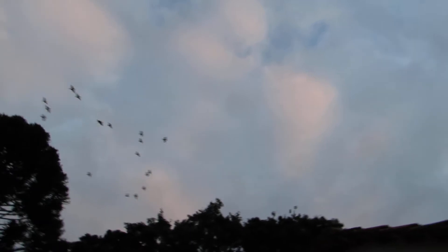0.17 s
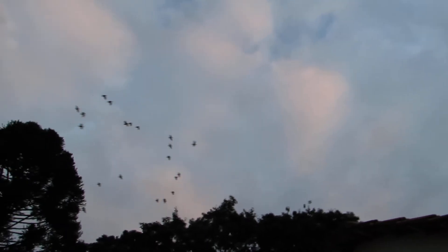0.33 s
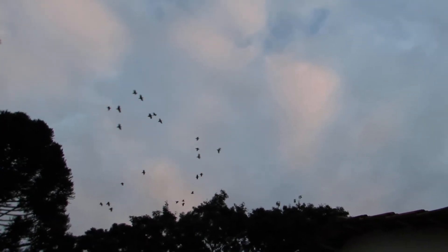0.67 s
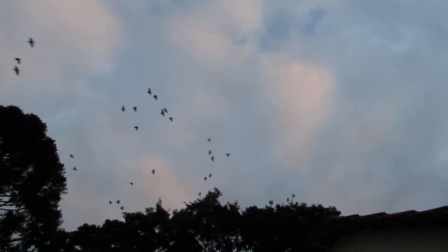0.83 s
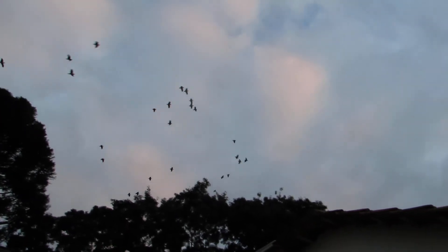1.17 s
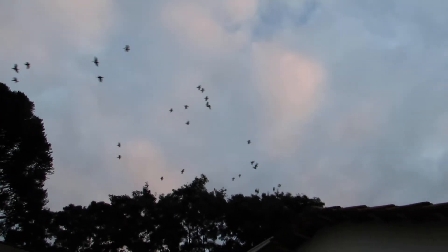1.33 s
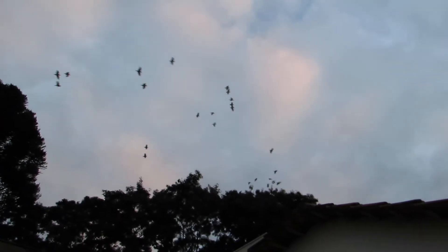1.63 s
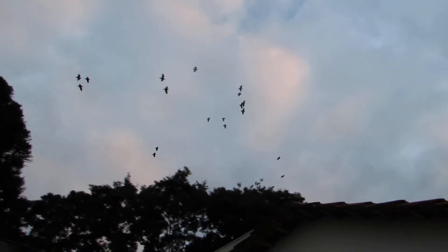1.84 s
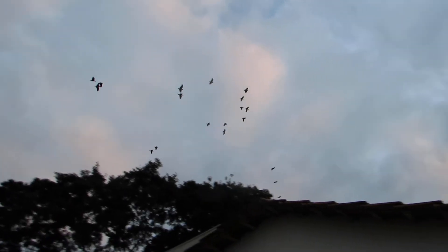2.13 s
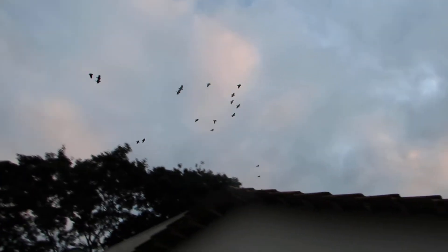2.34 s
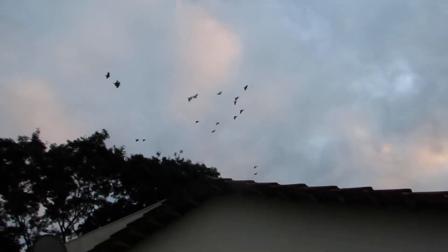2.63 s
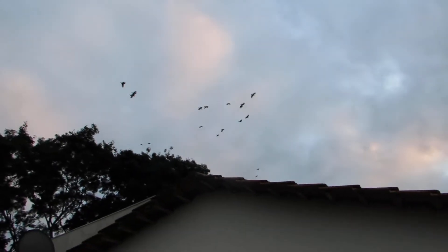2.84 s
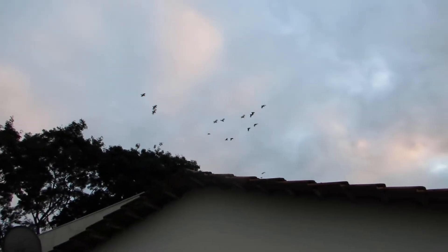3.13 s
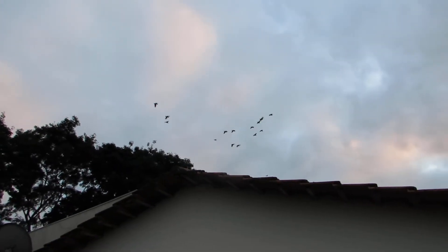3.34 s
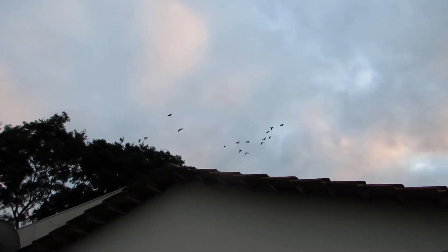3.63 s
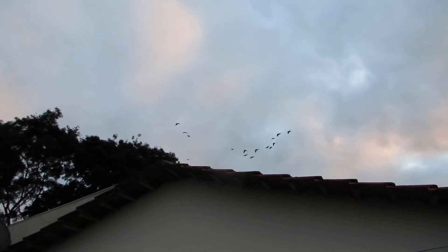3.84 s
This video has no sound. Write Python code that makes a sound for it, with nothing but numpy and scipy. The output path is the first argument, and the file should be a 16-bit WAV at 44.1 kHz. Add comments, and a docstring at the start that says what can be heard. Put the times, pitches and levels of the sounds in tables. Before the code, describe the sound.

Parrots call all at once in the open air, raspy squawks and quick yelps standing out from distant chatter throughout. Low wind rumbles on the microphone, with dull handling bumps and one small click in the first half.

```python
"""A flock of parrots flies over a house at dusk, all calling at once.
Outdoor hiss and wind rumble swell in under the far flock's chatter. Near birds break in with gliding
squawks and harsh rasps, buzzing voices shaped by the throat and echoed by walls and trees. Soft handling
knocks begin, the camera clicks once at 0.74 s, and air puffs on the microphone at 1.2 s.
Short yelps cluster from about 1 to 3 s; squawks and chatter carry on to the end."""
import sys
import numpy as np
from scipy import signal
from scipy.fft import rfft, irfft, next_fast_len
from scipy.io import wavfile
from scipy.ndimage import uniform_filter1d

SR = 44100
rng = np.random.default_rng(int(sys.argv[2]) if len(sys.argv) > 2 else 0)


def store_pcm(level_fs):
    """Save levels as 16-bit WAV."""
    pcm = np.round(np.clip(level_fs, -1, 1) * 32767).astype(np.int16)
    wavfile.write(sys.argv[1], SR, np.atleast_2d(pcm).T)


N = 175959

# near squawks: start_s, length_s, first_hz, middle_hz, last_hz, level_db, roughness (0-1),
# throat_hz, treble_db
SQUAWKS = [ (0.222, 0.21, 772.4, 737, 668, -37, 0.41, 2470, 12),
           (0.332, 0.086, 1319, 1217, 1120, -32, 0.1, 2470, 7),
           (0.369, 0.12, 1231, 1153, 1120, -37.5, 0.78, 1320, 9),
           (0.486, 0.03, 1200, 1322, 1380, -41, 0.2, 2630, -15),
           (0.52, 0.06, 1393, 1235, 1160, -31, 0.32, 2500, -1),
           (0.569, 0.077, 1212, 1106, 1040, -33.5, 0.48, 2270, 4),
           (0.557, 0.16, 683, 663.3, 641.5, -37, 0.32, 1410, 15),
           (.69, 0.098, 1130, 1124, 1065, -34, 0.31, 2200, 6.5),
           (0.841, 0.022, 1286, 1122, 960, -40, 0, 2170, -3),
           (0.931, 0.29, 722, 736, 750, -43, 0.82, 1560, 10),
           (1.156, 0.036, 738, 781, 765, -40.5, 0.25, 1570, 2),
           (1.164, 0.048, 1430, 1380, 724, -38.5, .08, 2500, 7),
           (1.196, 0.043, 1085, 945, 764, -36.5, 0.17, 1800, -5),
           (1.247, 0.094, 1135, 1340, 1120, -36.5, .05, 2400, -2),
           (1.289, .12, 624.4, 759, 745, -37, 0.2, 1470, 11.5),
           (1.348, 0.081, 1176, 1230, 1083, -32.5, 0.1, 2360, -2),
           (1.36, 0.086, 1018, 1042, 1046, -37.5, 0.13, 2090, 6),
           (1.339, 0.2, 650, 603, 580, -35, 0.45, 1240, 4),
           (1.432, 0.056, 1278, 1211, 1080, -37.5, 0.04, 2340, 13),
           (1.435, 0.048, 1009, 866, 790, -35, 0.23, 1710, -4),
           (1.519, 0.049, 678, 829, 833, -39.5, 0.4, 1730, -18),
           (1.611, 0.055, 941, 1001, 1044, -37, 0.5, 2050, 6),
           (1.661, 0.047, 673, 1040, 936, -34.5, 0.35, 2060, 3),
           (1.685, 0.079, 1121, 948, 800, -34, 0.61, 2050, 4),
           (1.885, .17, 570.2, 566.4, 512, -35, 0.63, 1490, 7.5),
           (1.892, 0.062, 1112, 1108, 998, -33.5, .3, 2100, 13),
           (1.965, 0.066, 768, 731.5, 687, -38.5, 0.41, 2020, 27),
           (2.004, 0.23, 923, 929.6, 890, -43, 0.35, 885, 0),
           (2.251, 0.16, 585, 558.4, 604, -37.5, 0.45, 1860, 3),
           (2.371, 0.14, 1001, 1082, 1105, -35.5, 0.6, 2210, 4),
           (2.494, 0.17, 679, 660, 638, -35.5, 0.88, 2180, 5),
           (2.772, .075, 583.5, 629, 602, -34, 0.62, 1320, 5),
           (2.551, 0.26, 785, 805, 791, -38, 0.4, 1590, 1),
           (2.834, 0.043, 1065, 1053, 1008, -34.5, 0.3, 2060, 6),
           (2.863, .1, 1108, 1069, 994, -38.5, 0.41, 2140, 15),
           (3.057, 0.13, 698.5, 704, 678, -37, 0.09, 3000, 16),
           (3.114, 0.06, 1030, 962, 864, -40, 0.3, 1800, -3),
           (3.16, 0.061, 1409, 1285, 1244, -29.5, 0.23, 2630, 5),
           (3.225, 0.28, 607, 570.3, 587.5, -42, 0.26, 1380, 9),
           (3.399, 0.071, 1130, 1086, 936, -36, 0.13, 2050, 9.5),
           (3.434, 0.041, 1071, 1023, 970, -33.5, 0, 2000, -4),
           (3.568, 0.076, 1063, 1025, 995, -40, 0.5, 2130, 5),
           (3.63, 0.14, 735, 722.4, 728, -42.5, 0.38, 1480, 5),
           (3.79, 0.099, 1089, 1202, 1225, -36.5, 0.34, 1100, 13),
           (3.825, 0.028, 1120, 998, 890, -34.5, 0.27, 1960, 7),
           (3.83, 0.1, 1215, 1266, 1223, -32, 0.64, 2650, 13)]
# short arched notes: start_s, top_pitch_hz, level_db
YELPS = [(.957, 1120, -37.5), (.972, 1380, -39.5), (.984, 1118, -36.5), (1.025, 1450, -41),
         (1.07, 1125, -38.5), (1.125, 1130, -34.5), (1.859, 1054, -36.5), (1.899, 1124, -30),
         (1.949, 1127, -28), (2.0, 1050, -35), (2.25, 1075, -41), (2.269, 1310, -37), (2.3, 1094, -39),
         (2.35, 1260, -40), (2.392, 1036, -33.5), (2.415, 1186, -34), (2.545, 992, -36), (2.59, 795, -37.5),
         (2.634, 822, -31.5), (2.696, 808, -33.5), (2.752, 816, -35), (3.008, 1137, -37.5)]
# tone colour of a parrot's voice: frequency_hz, gain_db
VOICE_EQ = [(100, -39), (300, -9), (650, -8.5), (950, -1), (1400, 4), (2400, 0), (3100, -4), (4300, -5.5),
            (5800, -13), (7300, -19.5), (9000, -25), (10000, -30), (12000, -25.5), (15000, -62)]
# swells of the far flock: time_s, level_db
FLOCK_SWELLS = [(0, -47), (.2, -44.5), (.45, -39), (1.0, -36.5), (1.25, -38), (1.45, -38.5), (1.6, -43.5),
                (1.82, -41), (2.0, -37), (2.18, -42.5), (2.6, -33.5), (2.85, -40.5), (3.0, -40.5),
                (3.3, -36), (3.532, -50), (3.7, -38.5), (4.0, -41)]
# time for the echoes to die away: frequency_hz, t60_s
ECHO_DECAY = [(300, 0.64), (2000, 0.25), (6000, 0.36), (14000, 0.13)]
# soft knocks on the camera: start_s, level_db, pitch_hz
KNOCKS = [(.447, -24, 410), (0.461, -21.5, 384), (0.477, -21.5, 390), (0.531, -24, 485),
          (0.562, -22.5, 420), (0.742, -22.5, 400), (0.96, -22.5, 490), (1.088, -25, 261),
          (1.244, -17.5, 315), (1.497, -22.5, 443), (2.695, -24, 494)]
# ring of the camera's click: frequency_hz, level_db, t60_s
CLICK_MODES = [(570, -6, 0.014), (1250, 3.5, 0.0055), (2760, 0.5, 0.0065), (6900, -1.5, 0.0072),
               (7560, -1.5, .007), (8560, -5.5, 0.014), (12700, -17, 0.0064)]
# outdoor air common to both channels: frequency_hz, density_db
AIR_MID = [(25, 1), (125, -0.5), (300, -4), (650, -10.5), (900, -2), (1350, -16), (2100, -10.5),
           (2800, -16), (4400, -23), (8100, -37), (11500, -35), (15000, -49)]
# outdoor air opposed between the channels: frequency_hz, density_db
AIR_SIDE = [(25, -11), (125, 7), (200, -15), (300, -16), (500, -3), (650, -8), (2100, -23), (3600, -30),
            (7500, -34), (12000, -44), (15000, -57)]
# wind on the microphone: frequency_hz, density_db
WIND_RUMBLE = [(15, -10), (30, 0), (70, 18.5), (130, 2), (200, 8), (350, -1), (600, -10), (1200, -48)]

LEFT_LEAN_DB = 2.0  # birds and echoes sit to the left
TOP_HZ = 14700  # upper edge of the whole sound


def parrot_call(length_s, first_hz, middle_hz, last_hz, level_db, rough, throat_hz, treble_db):
    """One call: a buzz coloured by the throat, joined by its bounce off the roof, placed in stereo."""
    attack, release = 0.31, 0.19  # shares of the length
    roof_gain, roof_max_s, lag_max_s = 0.46, .005, .00003
    n = int(length_s * SR)
    progress = np.linspace(0, 1, n)
    pan, lag, path = rng.uniform(-1, 1, 3)
    buzz = voice_buzz(progress, first_hz, middle_hz, last_hz, rough)
    size = next_fast_len(2 * n)
    f = np.fft.rfftfreq(size, 1 / SR)
    roof = 1 + roof_gain * np.exp(-2j * np.pi * f * roof_max_s * abs(path))
    voice = unit(irfft(rfft(buzz, size) * throat(f, throat_hz, treble_db) * roof, size)[:n])
    ramp = np.clip(np.minimum(progress / attack, (1 - progress) / release), 0, 1)
    voice *= amp(level_db) * np.sin(np.pi / 2 * ramp)
    right = irfft(rfft(voice, size) * np.exp(2j * np.pi * f * lag * lag_max_s), size)[:n]
    lean_db = LEFT_LEAN_DB - pan
    return np.array([voice * amp(lean_db), right * amp(-lean_db)])


def voice_buzz(progress, first_hz, middle_hz, last_hz, rough):
    """A gliding harmonic tone; roughness shakes its pitch, adds breath and chops it into a rasp."""
    n = len(progress)
    glide_hz = np.polyval(np.polyfit([0, .5, 1], [first_hz, middle_hz, last_hz], 2), progress)
    jitter = 0.0632 * rough * wobble(n, rate_hz=356)
    waver = 0.0079 * np.sqrt(rough) * wobble(n, rate_hz=91)
    bend = 0.01127 * np.sqrt(rough) * wobble(n, rate_hz=21)
    phase = 2 * np.pi * np.cumsum(glide_hz * (1 + jitter + waver) * (1 + bend)) / SR
    tone = harmonics(phase, middle_hz)
    breath = (1 + np.cos(phase)) * wobble(n, rate_hz=TOP_HZ)  # one puff per cycle
    rasp = np.exp(0.63 * np.sqrt(rough) * np.tanh(wobble(n, rate_hz=169)))
    return ((1 - rough ** 2) * tone + 0.78 * rough * breath) * rasp


def harmonics(phase, pitch_hz):
    """A stack of partials that each flutter in level; the lowest two hold steady."""
    flutter_s, flutter_db = .014, 3
    steps = np.arange(len(phase)) / SR / flutter_s
    gains = amp(flutter_db * rng.standard_normal((32, 32)))
    gains[:2] = 1
    return unit(sum(np.interp(steps, np.arange(len(gain)), gain) * np.cos(k * phase)
                    for k, gain in enumerate(gains[:int(TOP_HZ / pitch_hz)], 1)))


def throat(f, throat_hz, treble_db):
    """Gain curve of the voice: its tone colour, a treble shelf and two throat resonances."""
    lower_width_hz, upper_width_hz = 375, 440
    shelf_db = treble_db * curve([(2500, 0.17), (4200, 0.9)], f)
    lower_db = 15 / (1 + ((f - throat_hz) / lower_width_hz) ** 2)
    upper_db = 6 / (1 + ((f - 2.6 * throat_hz) / upper_width_hz) ** 2)
    return amp(curve(VOICE_EQ, f) + shelf_db + lower_db + upper_db)


def near_birds():
    """The birds overhead: squawks, and quick yelps that rise and fall in pitch."""
    out, yelp_s = np.zeros((2, N)), .027
    for start_s, *shape in SQUAWKS:
        add(out, start_s, parrot_call(*shape))
    for start_s, top_hz, level_db in YELPS:
        foot_hz = .85 * top_hz
        add(out, start_s, parrot_call(yelp_s, foot_hz, top_hz, foot_hz, level_db,
                                      rough=.15, throat_hz=2 * top_hz, treble_db=-4))
    return out


def far_flock():
    """The rest of the flock: a bed of short random calls whose level swells and sinks."""
    calls_per_s, shortest_s, longest_s = 55, 0.0299, .13
    out, count = np.zeros((2, N)), int(calls_per_s * N / SR)
    for slot in range(count):
        when, length, pitch, glide, loudness, resonance = rng.random(6)
        length_s = shortest_s + (longest_s - shortest_s) * length
        middle_hz = 600 + 620 * pitch
        first_hz = middle_hz * (1 + .3 * (glide - .7))
        call = parrot_call(length_s, first_hz, middle_hz, .86 * middle_hz, 6 * loudness,
                           rough=0.426, throat_hz=900 + 1500 * resonance, treble_db=4)
        add(out, (slot + when) / count * N / SR, call)
    return unit(out) * amp(np.interp(np.arange(N) / SR, *np.transpose(FLOCK_SWELLS)))


def echoes(birds):
    """Scattered reflections from walls and trees; the lows hang on longest."""
    send_db, width = -7.5, 0.86
    hz, t, grains = signal.stft(rng.standard_normal((2, SR // 2)), SR, nperseg=256)
    decay = amp(-60 * t / curve(ECHO_DECAY, hz)[:, None]) * (t > 0)
    tail = signal.istft(grains * decay, SR, nperseg=256)[1]
    tail /= np.linalg.norm(tail[0])
    mid, side = signal.fftconvolve(birds.mean(0)[None], tail, axes=1)[:, :N]
    left, right = mid + width * side, mid - width * side
    return amp(send_db) * np.array([left * amp(LEFT_LEAN_DB), right * amp(-LEFT_LEAN_DB)])


def handling_knocks():
    """Dull bumps on the camera body, each a brief low tone mixed with grit."""
    out, t = np.zeros((2, N)), np.arange(SR // 10) / SR
    rise_s = .004
    envelope = t / rise_s * np.exp(1 - t / rise_s)
    for start_s, level_db, pitch_hz in KNOCKS:
        body = np.sin(2 * np.pi * pitch_hz * t) + .7 * wobble(len(t), rate_hz=730)
        add(out, start_s, np.outer([1, -.4], amp(level_db) * body * envelope))
    return out


def camera_click():
    """One sharp tick rings the camera body, a touch later and softer on the right."""
    out, t = np.zeros((2, N)), np.arange(SR // 10) / SR
    start_s, lag_s, gain_db = .7417, .000028, -18
    ring = -sum(amp(db - 60 * t / t60) * np.sin(2 * np.pi * hz * t) for hz, db, t60 in CLICK_MODES)
    add(out, start_s, np.outer([1, 0], ring))
    add(out, start_s + lag_s, np.outer([0, .7], ring))
    return amp(gain_db) * out


def wind_puff():
    """A single soft, deep push of air on the microphone."""
    start_s, length_s, pitch_hz, level_db = 1.172, .045, 45, -33
    out, t = np.zeros((2, N)), np.arange(0, length_s, 1 / SR)
    push = amp(level_db) * np.hanning(len(t)) * np.sin(2 * np.pi * pitch_hz * t)
    add(out, start_s, np.outer([1, 1], push))
    return out


def outdoor_air():
    """Outdoor hiss and a wide rumble of wind on the microphone, swelling in at the start."""
    start_db, rise_s = -7, 0.65
    mid = amp(-40.5) * drifting_noise(AIR_MID, drift_db=1.8)
    side = amp(-39) * drifting_noise(AIR_SIDE, drift_db=1.8)
    side += amp(-34.5) * drifting_noise(WIND_RUMBLE, drift_db=1.5)
    bed = np.array([mid + side, mid - side])
    lean_db = curve([(130, -0.81), (400, 2.0), (4000, 2.0), (12000, -0.6)], np.fft.rfftfreq(N, 1 / SR))
    swell = amp(start_db * np.clip(1 - np.arange(N) / SR / rise_s, 0, 1))
    return swell * irfft(rfft(bed) * amp([lean_db, -lean_db]), N)


def drifting_noise(spectrum, drift_db):
    """Coloured noise in which patches of the spectrum drift up and down in level."""
    hz = np.fft.rfftfreq(1024, 1 / SR)
    real, imag, patches = rng.standard_normal((N // 256 + 5, len(hz), 3)).T
    patches = unit(uniform_filter1d(uniform_filter1d(patches, size=8, axis=0), size=10, axis=1))
    grains = (real + 1j * imag) * amp(curve(spectrum, hz)[:, None] + drift_db * patches)
    return unit(signal.istft(grains, nperseg=1024, noverlap=768)[1][:N])


def wobble(n, rate_hz):
    """Random motion that rolls off above a rate, rms about 1."""
    f = np.fft.rfftfreq(16384, 1 / SR)
    return unit(irfft(rfft(rng.standard_normal(16384)) / (1 + (f / rate_hz) ** 4)))[:n]


def amp(db):
    """Decibels to gain."""
    return 10 ** (np.asarray(db) / 20)


def unit(x):
    """Scales to rms 1."""
    return x / np.sqrt(np.mean(x ** 2) + 1e-20)


def curve(points, hz):
    """Reads breakpoints on a log-frequency axis."""
    f, value = np.transpose(points)
    return np.interp(np.log(hz + 1), np.log(f + 1), value)


def add(mix, start_s, sound):
    """Drops a stereo sound into the mix at its cue."""
    part = mix[:, max(round(start_s * SR), 0):][:, :sound.shape[1]]
    part += sound[:, :part.shape[1]]


def scene():
    """The flock and its echoes over the air and the handling noise."""
    background = outdoor_air() + handling_knocks() + camera_click() + wind_puff()
    birds = near_birds() + far_flock()
    return birds + echoes(birds) + background


def record(dry):
    """Two narrow microphone notches an octave apart, an instant of opening silence and a steep top cut."""
    notch_hz, width_hz, notch_db, silence_s = 3942, 115, -9.5, .093
    f = np.fft.rfftfreq(N, 1 / SR)
    notches = sum(np.exp(-((f - k * notch_hz) / width_hz) ** 2) for k in (1, 2))
    live = irfft(rfft(dry) * amp(notch_db * notches), N) * (np.arange(N) / SR >= silence_s)
    top_cut = signal.firwin(255, TOP_HZ, window=("kaiser", 9), fs=SR)
    return signal.oaconvolve(live, top_cut[None], "same")


dry = scene()
out = record(dry)
store_pcm(out)
```